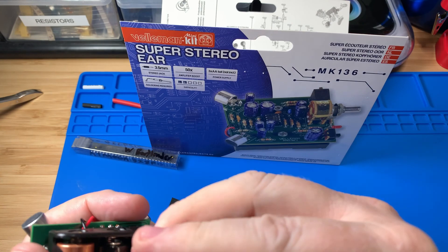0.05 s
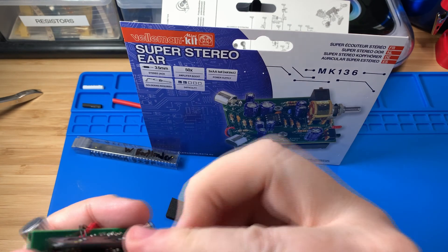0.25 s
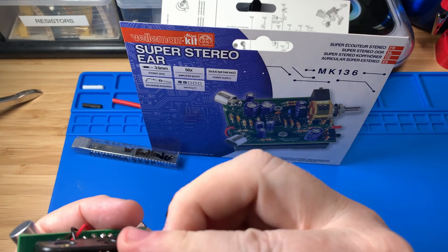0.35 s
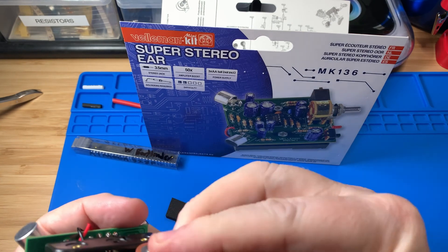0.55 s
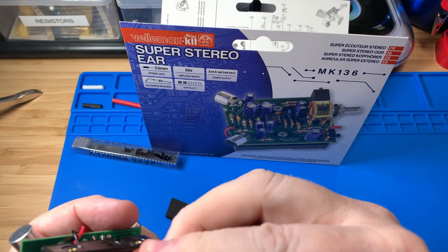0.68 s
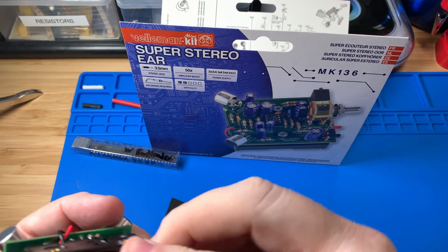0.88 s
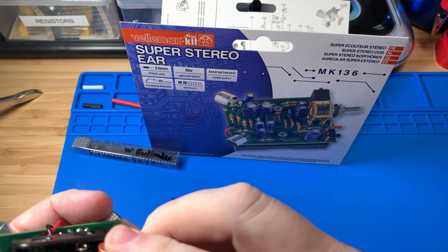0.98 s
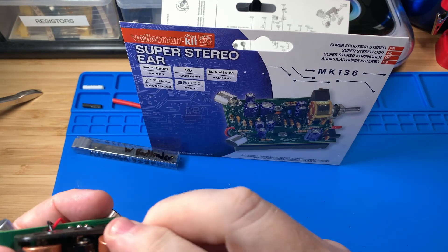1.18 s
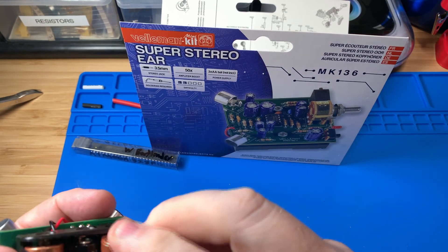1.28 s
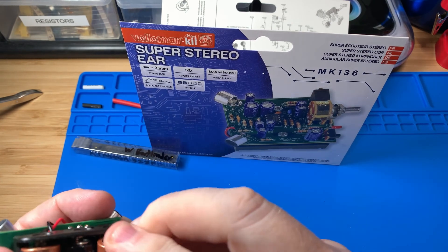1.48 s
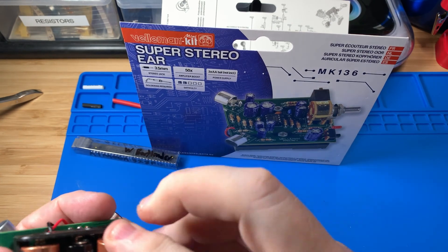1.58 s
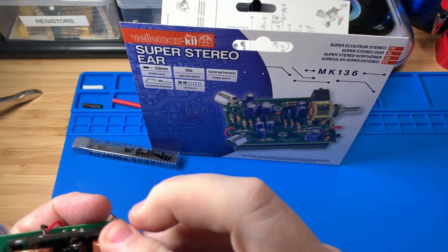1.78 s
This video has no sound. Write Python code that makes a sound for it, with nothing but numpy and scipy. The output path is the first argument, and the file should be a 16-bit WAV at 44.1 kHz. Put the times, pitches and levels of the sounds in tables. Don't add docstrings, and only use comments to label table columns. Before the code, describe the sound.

Batteries snap into a plastic holder, two sharp loud clicks among small scrapes over low hum

```python
import sys
import numpy as np
from scipy import signal
from scipy.fft import rfft, irfft, next_fast_len
from scipy.io import wavfile
from scipy.ndimage import uniform_filter1d, map_coordinates

SR = 44100
rng = np.random.default_rng(int(sys.argv[2]) if len(sys.argv) > 2 else 0)


def linear_from_db(decibels):
    return 10 ** (np.asarray(decibels, float) / 20)


def wav_record(signal):
    frames = np.transpose(np.atleast_2d(signal))
    bounded = np.clip(frames, -1, 1)
    quanta = np.round(bounded * 32767).astype(np.int16)
    wavfile.write(sys.argv[1], SR, quanta)


N = 81585
LEAD = 60


def snaps():
    # start_s, peak_db, pitch_hz, brightness_db, crack_ms
    snap_table = [(0.2156, -22.5, 3900, -25, 1.4), (0.2261, -26.5, 4320, -9.5, 1.6),
                  (0.2567, 0, 3955, -14, 0.089), (0.3148, -51, 3050, -9, 0.71),
                  (0.574, -26, 4430, -19.5, 0.97), (.6093, -23.5, 3330, -33, 0.164),
                  (0.744, -41.5, 3770, -26, 0.39), (.802, -45, 8100, -27, 12),
                  (0.859, -1.5, 3512, -44.5, 0.31), (0.8579, -14, 7350, -41, 3.3),
                  (0.8598, -18.5, 9240, -14, 1.2), (1.0146, -38.5, 3350, -21, 0.42),
                  (1.0164, -46.5, 6200, -31, 3.6), (1.7719, -40, 5000, -26, 1.02),
                  (1.7834, -19.5, 8700, -34.5, 0.126), (1.781, -34.5, 3930, -28, 0.24)]
    ring_q, delay_s = 3.74, 0.00037
    out = np.zeros((2, N))
    t = np.arange(1500) / SR
    for start_s, peak_db, pitch_hz, bright_db, crack_ms in snap_table:
        decay = np.exp(-t / (crack_ms / 2000))
        onset = 1 - np.exp(-t / 0.0003)
        crack, *board = rng.standard_normal((3, len(t))) * decay * onset
        body_db = 3.5 - 42.5 * (pitch_hz > 5500)

        def ringing(f):
            return resonance(f, pitch_hz, pitch_hz / ring_q) ** 2 - linear_from_db(body_db) * holder(f)

        ring = filtered(crack, ringing)
        sharp = filtered(np.pad(crack, (LEAD, 0)), edge)[LEAD:]
        snap = ring / abs(ring).max() + linear_from_db(bright_db + 23.5) * sharp / abs(sharp).max()
        add(out, start_s + delay_s, space(linear_from_db(peak_db - 3) * snap))

        thud = filtered(np.array(board), lambda f: resonance(f, 1440, 3800) ** 2)
        thud = thud / abs(thud).max(axis=1, keepdims=True)
        add(out, start_s + delay_s, linear_from_db(peak_db - 23.5 + body_db) * thud)
    return out


def knocks():
    # start_s, peak_db, pitch_hz, t60_s
    knock_table = [
        (.2172, -22, 1050, 0.0089),
        (.257, -23.5, 554, 0.012),
        (.257, -45, 75, .3),
        (0.259, -40.5, 261, 0.1002),
        (.8595, -29, 947, 0.026),
        (0.8603, -35, 500, 0.04),
        (.861, -29.5, 144, 0.061),
        (.86, -32, 264.7, 0.037),
        (1.576, -41.5, 950, 0.028),
    ]
    out = np.zeros((2, N))
    t = np.arange(2 * (SR // 10)) / SR
    for start_s, peak_db, pitch_hz, t60_s in knock_table:
        onset = 1 - np.exp(-t * pitch_hz)
        add(out, start_s, space(linear_from_db(peak_db - 60 * t / t60_s) * np.sin(2 * np.pi * pitch_hz * t) * onset))
    return out


def scrapes():
    # start_s, length_s, level_db, brightness_db, spring_db
    scrape_table = [(.002, 0.023, -54.5, -2.5, -7), (0.081, 0.023, -61, -8, -10),
                    (0.183, 0.039, -44, 0.5, -13.5), (.194, 0.0095, -32.5, -1.5, -13.5),
                    (0.217, 0.0047, -45, 16, -14), (0.2228, 0.01, -44.5, 13, -7),
                    (0.242, .022, -41, -24, -6), (0.46, 0.0074, -51, 0, -20), (0.471, 0.0597, -52.5, -2, 6),
                    (0.515, 0.12, -63, -0.5, -19), (.612, 0.041, -65, -30, -27),
                    (0.674, 0.039, -62, 0.5, -22), (0.732, 0.068, -61.5, -7, 1.5),
                    (0.843, 0.023, -43.5, -5, -25), (0.876, 0.085, -60, -0.5, -5),
                    (1.027, .02, -73.5, -11, -15), (1.168, 0.11, -82, 1, -8),
                    (1.232, 0.039, -58.5, -27, -2.5), (1.357, 0.0069, -46, 1, -7),
                    (1.401, 0.0083, -42.5, -6.5, 5), (1.407, 0.032, -58.5, -22.5, -11),
                    (1.573, 0.009, -40.5, 7.5, 10.5), (1.588, 0.0065, -59, 12.7, -17.5),
                    (1.583, 0.047, -64.5, -4.5, 6)]
    out = np.zeros((2, N))
    grit = rng.standard_normal(N) * linear_from_db(2.5 * wobble(900))
    holder_rms, edge_rms, spring_rms = [np.std(filtered(grit, colour)) for colour in (holder, edge, spring)]
    for start_s, length_s, level_db, bright_db, spring_db in scrape_table:
        progress = np.arange(round(length_s * SR)) / (length_s * SR)
        swell = np.sin(np.pi * progress ** 0.8) ** 0.9
        rub = grit[round(start_s * SR):][:len(progress)] * swell
        rub = np.pad(rub, (LEAD, SR // 10))

        def driven(f):
            hard = linear_from_db(bright_db) * edge(f) / edge_rms
            coil = linear_from_db(spring_db) * spring(f) / spring_rms
            return holder(f) / holder_rms + hard + coil

        add(out, start_s, space(linear_from_db(level_db) * filtered(rub, driven)[LEAD:]))
    return out


def holder(f):
    # pitch_hz, width_hz, level_db
    modes = [(2850, 300, -10), (3400, 550, -5), (3950, 500, -1.5), (4450, 400, .1)]
    total = 0
    for k, (pitch_hz, width_hz, level_db) in enumerate(modes):
        total = total + (-1) ** k * linear_from_db(level_db) * resonance(f, pitch_hz, width_hz)
    return total * resonance(f, 3000, 2000)


def edge(f):
    # frequency_hz, level_db
    edge_colour = [(900, -32), (1900, 0.5), (5000, -3.5), (6800, -3.1), (8500, -0.5), (12000, -2.9),
                   (15000, -1.5), (16300, -17.5), (16900, -109)]
    return linear_from_db(along(edge_colour, f))


def spring(f):
    # pitch_hz, level_db, t60_s
    coil_modes = [(4450, .1, .011), (4480, -19, .08), (6800, -15, .007), (10100, -17, .007),
                  (11900, -17, .007)]
    return sum(linear_from_db(level_db) * resonance(f, pitch_hz, np.log(1000) / np.pi / t60_s)
               for pitch_hz, level_db, t60_s in coil_modes)


def space(x):
    # frequency_hz, t60_s
    room_decay = [(300, 0.51), (3500, 0.21), (8000, 0.16), (16000, .2)]
    # frequency_hz, likeness
    tail_likeness = [(300, 0.2), (2500, .3), (5500, 0.74), (7500, 0.89), (16000, 0.87)]
    room_db, tilt_db, desk_db, desk_t60_s = -19.5, 0.1, -9.5, 0.035
    hz, t, z = signal.stft(rng.standard_normal((2, SR // 4)), SR, nperseg=128)
    alike = np.clip(along(tail_likeness, hz), 0, 1)[:, None]
    z = np.array([z[0], alike * z[0] + np.sqrt(1 - alike ** 2) * z[1]])

    colour_db = room_db + tilt_db * np.log2(hz[:, None] / 4000 + 0.033)
    room = linear_from_db(colour_db - 60 * t / along(room_decay, hz)[:, None]) / np.sqrt(0.3)
    desk = linear_from_db(desk_db - 60 * t / desk_t60_s) / np.sqrt(desk_t60_s)
    tail = signal.istft(z * (room + desk), SR, nperseg=128)[1] * np.sqrt(2 * np.log(1000) / SR)
    tail[:, :60] = 0
    tail[:, 0] = 1
    return signal.fftconvolve(x[None], tail, axes=1)


def hum():
    # time_s, pitch_hz, level_db
    motor = [(0.0, 55.55, -36.5), (0.184, 56.41, -52.5), (0.236, 56.83, -47.5), (0.704, 56.88, -40),
             (0.942, 58.1, -57.5), (1.024, 57.37, -42.5), (1.298, 56.57, -42), (1.328, 57.53, -54.5),
             (1.494, 57.04, -44), (1.762, 52.7, -43.5), (1.818, 54.3, -50.5), (1.85, 56.3, -44)]
    # multiple, level_db
    harmonics = [(3, -19.5), (5, -29)]
    pan_db = -4.5
    time_s, pitch_hz, level_db = np.transpose(motor)
    t = np.arange(N) / SR
    phase = 2 * np.pi * np.cumsum(np.interp(t, time_s, pitch_hz)) / SR
    tone = linear_from_db(np.interp(t, time_s, level_db) + 0.53 * wobble(25)) * np.sin(phase + 0.33 * wobble(11))
    for multiple, harmonic_db in harmonics:
        flicker = linear_from_db(np.mean(level_db) + harmonic_db + 2.3 * wobble(5))
        tone = tone + flicker * np.sin(multiple * phase + 2.2 * wobble(9.21))
    return np.sqrt(2) * tone * linear_from_db([[pan_db / 2], [-pan_db / 2]])


def ticks():
    period_s, echo_s = 0.033367, 0.0013
    at = np.arange(0.01725, N / SR, period_s)
    chance = rng.standard_normal((len(at), 3))
    at = at + 0.0015 * chance[:, 0]
    pulses = np.zeros(N + SR)
    pulses[np.round(at * SR).astype(int)] = linear_from_db(1.5 * chance[:, 1])
    pulses[np.round((at + echo_s) * SR).astype(int)] = -linear_from_db(-4.5 + 3 * chance[:, 2])
    ring = filtered(pulses[:N], lambda f: resonance(f, 11000, 4100) ** 2 * (f < 16000))
    return linear_from_db(-56 + 9.5) * 3 * ring


def rumble():
    # frequency_hz, density_db (per Hz)
    rumble_colour = [(20, -19.5), (45, 2), (80, 2.5), (170, -4), (280, -8), (380, -18), (950, -18),
                     (1400, -30), (2600, -35.5), (3500, -89.5)]
    # time_s, level_db
    rumble_swell = [(0, 4.5), (.3, 2), (.6, 2.6), (.8, 0), (1.1, -0.5), (1.5, -0.6), (1.85, -0.5)]
    swell_db = np.interp(np.arange(N) / SR, *np.transpose(rumble_swell))
    return linear_from_db(-50 + swell_db) * rush(rumble_colour, patchy_db=3.0)


def hiss():
    # frequency_hz, level_db
    hiss_colour = [(1000, -17), (2000, -8.8), (4000, -4), (7000, -8.5), (10000, -8.5), (15500, -10.5),
                   (16100, -14), (16400, -58.5)]
    return linear_from_db(-70.5) * rush(hiss_colour, patchy_db=4.2)


def rush(spectrum, patchy_db):
    # frequency_hz, likeness
    likeness = [(50, .95), (200, .8), (700, .2), (5500, .1), (7800, .995), (16000, .995)]
    z = signal.stft(rng.standard_normal((2, N)), nperseg=512)[2]
    field = uniform_filter1d(rng.standard_normal(z.shape[1:]), size=5, axis=0)
    field = uniform_filter1d(field, size=10, axis=1)
    pair = signal.istft(z * linear_from_db(patchy_db * unit(field)), nperseg=512)[1][:, :N]

    def colour(f):
        angle = np.arccos(np.clip(along(likeness, f), -1, 1)) / 2
        return linear_from_db(along(spectrum, f)) * [np.cos(angle), np.sin(angle)]

    mid, side = filtered(pair, colour)
    return unit(np.array([mid + side, mid - side]))


def resonance(f, hz, width_hz):
    return 1j * f * width_hz / (hz * hz - f * f + 1j * f * width_hz)


def filtered(x, response):
    n = x.shape[-1]
    m = next_fast_len(n + 3000)
    return irfft(rfft(x, m) * response(np.fft.rfftfreq(m, 1 / SR)), m)[..., :n]


def along(points, hz):
    f, v = np.transpose(points)
    return np.interp(np.log(hz + 1), np.log(f + 1), v)


def wobble(rate):
    knots = rng.standard_normal(int(N * rate / SR) + 4)
    return map_coordinates(knots, [np.arange(N) * rate / SR])


def unit(x):
    return x / np.sqrt(np.mean(x ** 2) + 1e-20)


def add(track, s, x):
    part = track[..., round(s * SR):][..., :x.shape[-1]]
    part += x[..., :part.shape[-1]]


def scene():
    return snaps() + knocks() + scrapes() + hum() + ticks() + rumble() + hiss()


def roll_off(x):
    return signal.sosfilt(signal.butter(12, 17010, fs=SR, output="sos"), x)


def record(dry):
    # frequency_hz, right_lead_rad
    port_phase = [(0, 0), (250, -.2), (700, -1.6), (3800, -6.3), (5200, -7.5), (6500, -6.4), (8500, -3.14),
                  (11000, 0), (13600, 3.14), (17000, 7.4)]
    # frequency_hz, left_over_right_db
    port_level = [(300, 0.5), (1000, 1.5), (2500, 1.77), (4300, -3.5), (6500, -0.7), (16000, 1)]

    def ports(f):
        phase = np.interp(f, *np.transpose(port_phase))
        left = linear_from_db(along(port_level, f) / 2) * np.exp(-0.5j * phase)
        return np.array([left, 1 / left]) * (f < 16900)

    return roll_off(filtered(dry, ports))


dry = scene()
out = record(dry)
wav_record(out)
```